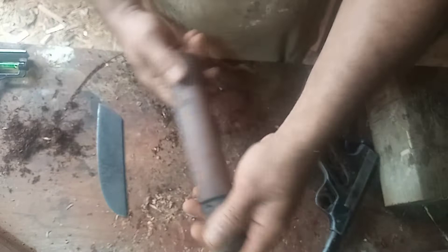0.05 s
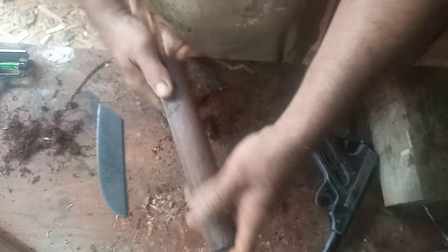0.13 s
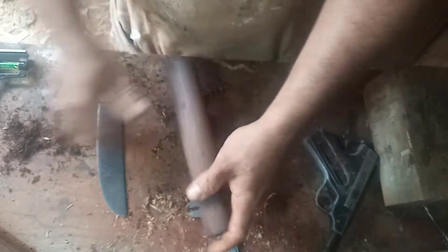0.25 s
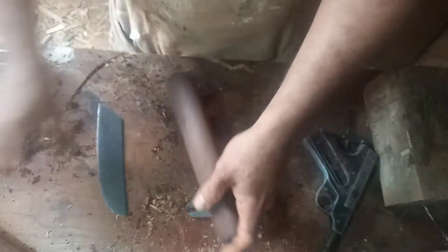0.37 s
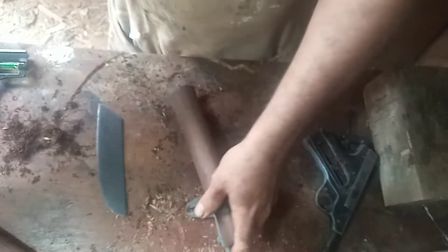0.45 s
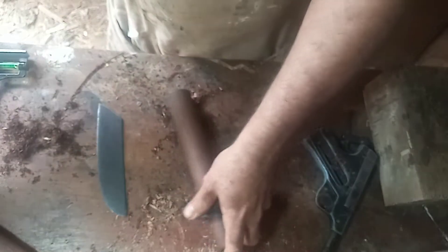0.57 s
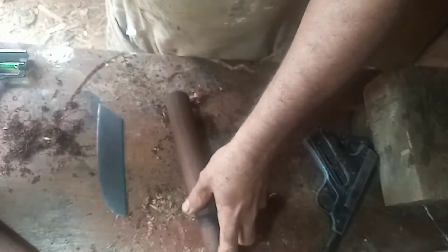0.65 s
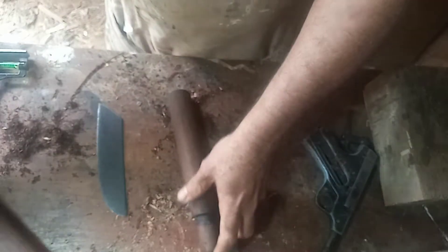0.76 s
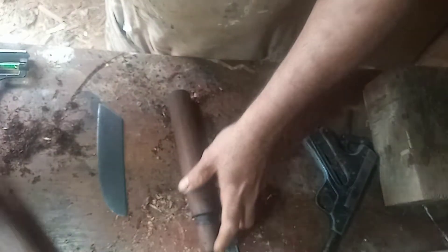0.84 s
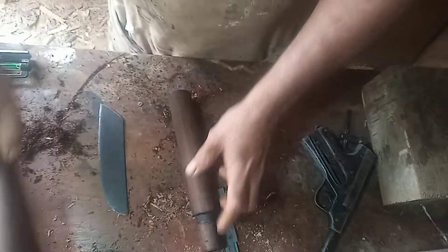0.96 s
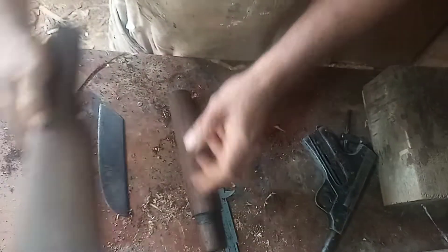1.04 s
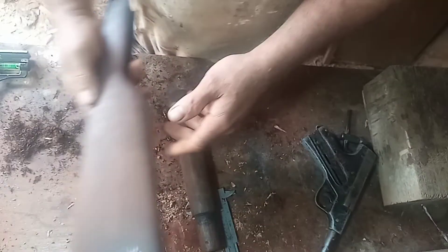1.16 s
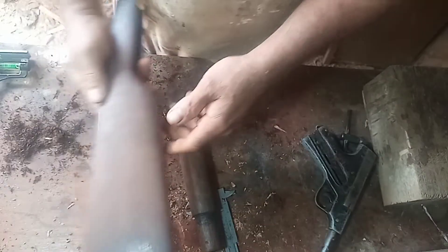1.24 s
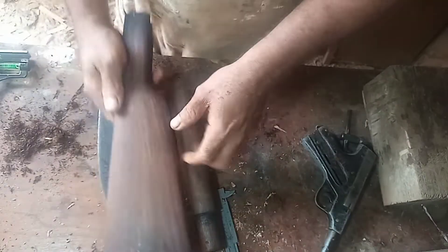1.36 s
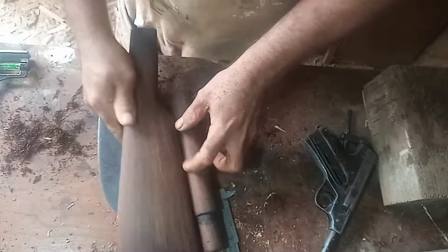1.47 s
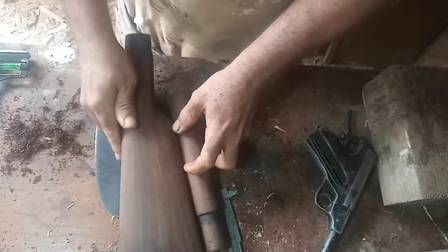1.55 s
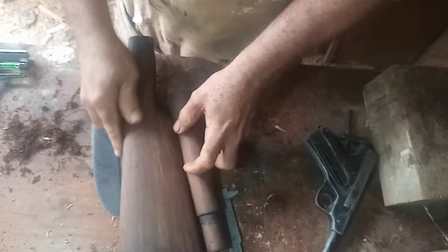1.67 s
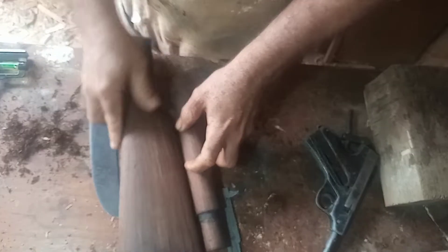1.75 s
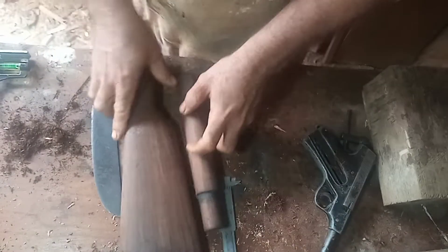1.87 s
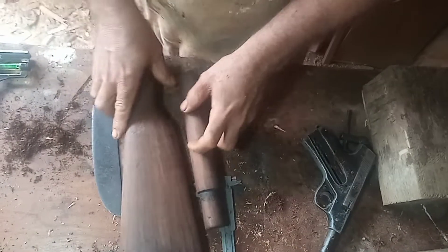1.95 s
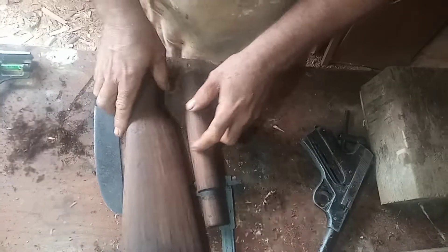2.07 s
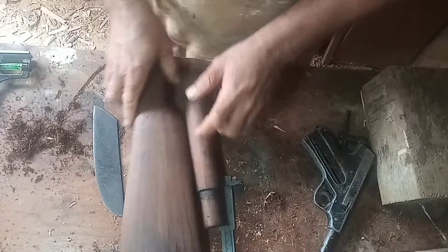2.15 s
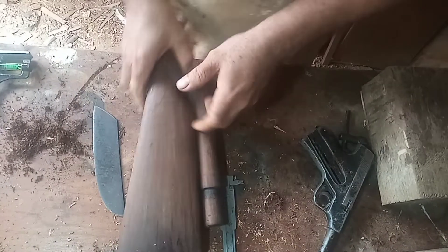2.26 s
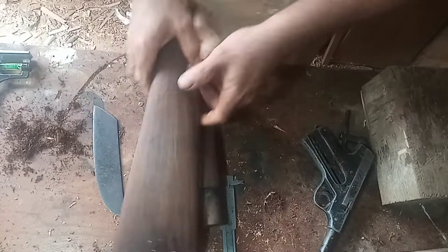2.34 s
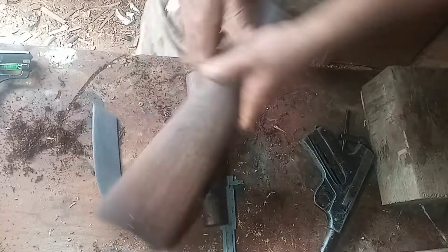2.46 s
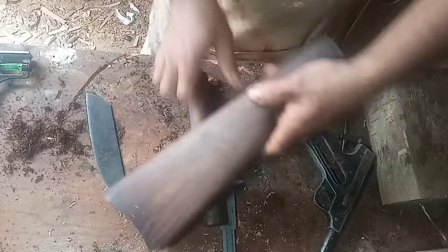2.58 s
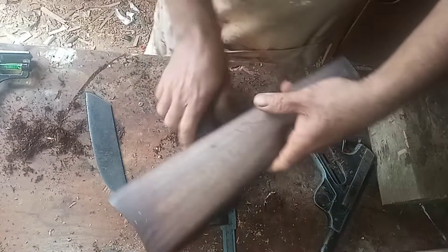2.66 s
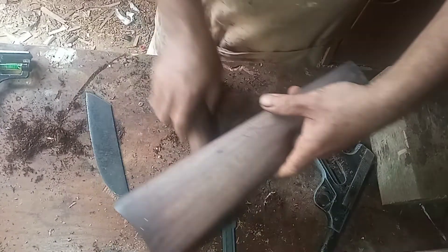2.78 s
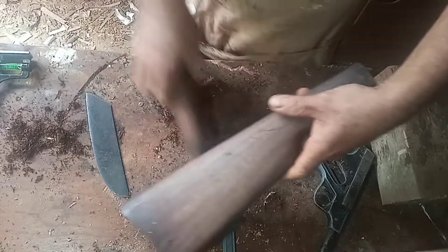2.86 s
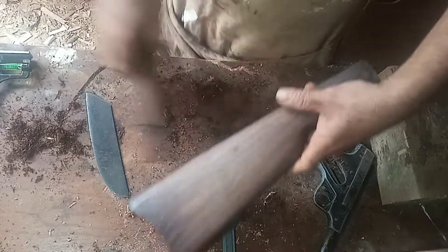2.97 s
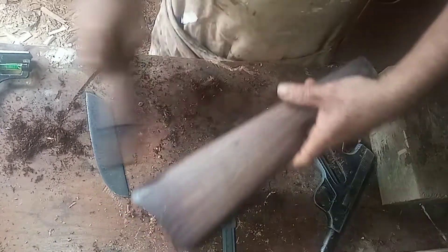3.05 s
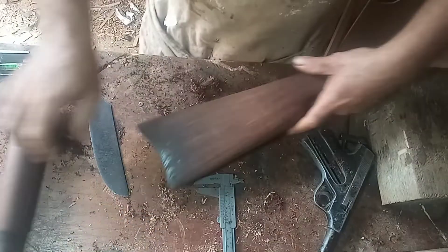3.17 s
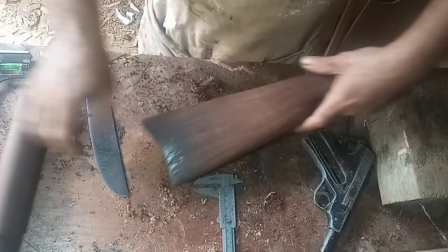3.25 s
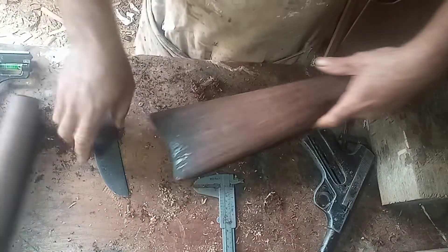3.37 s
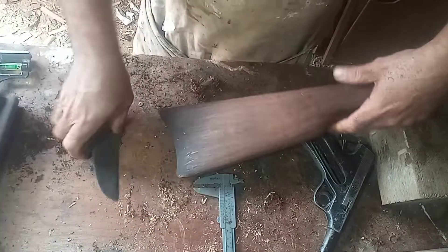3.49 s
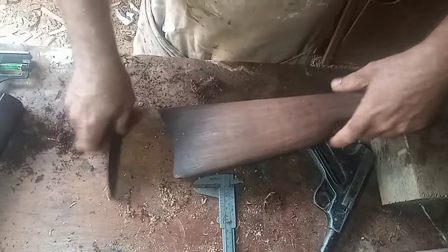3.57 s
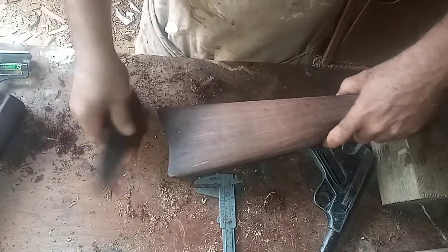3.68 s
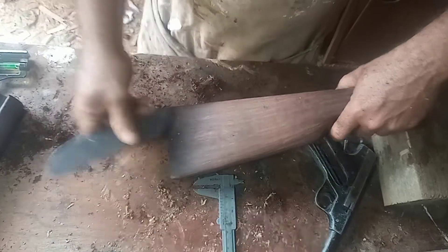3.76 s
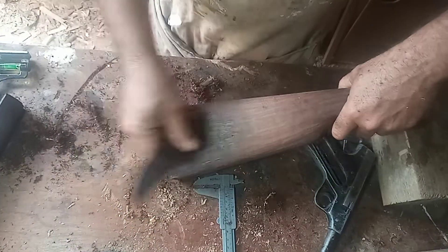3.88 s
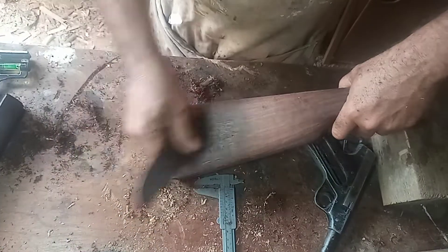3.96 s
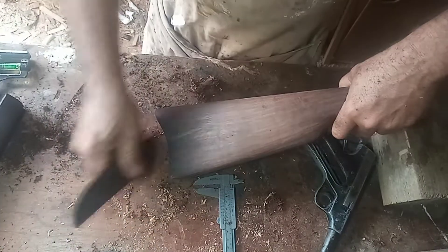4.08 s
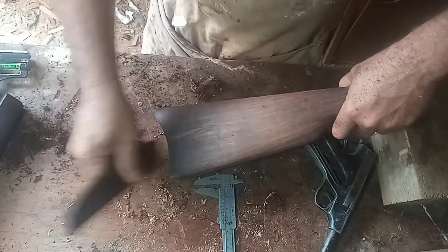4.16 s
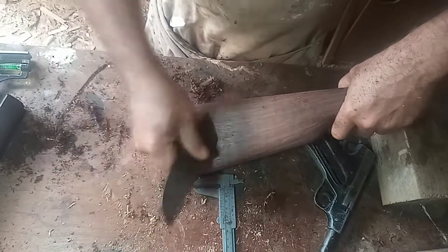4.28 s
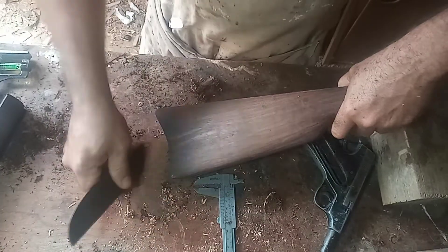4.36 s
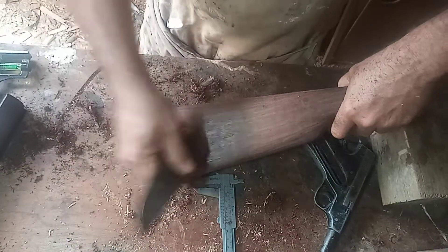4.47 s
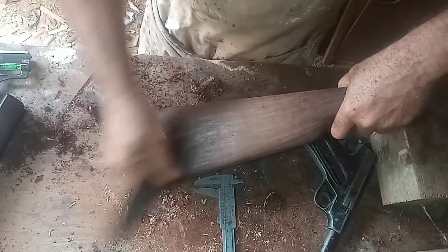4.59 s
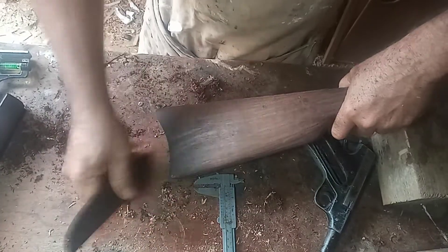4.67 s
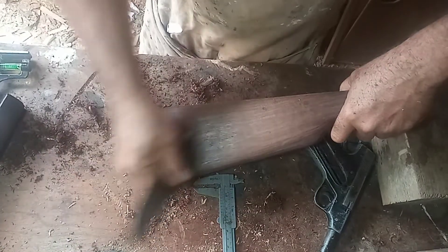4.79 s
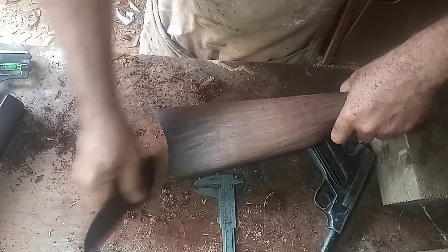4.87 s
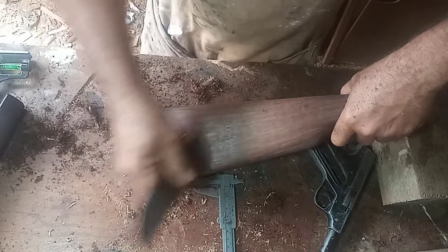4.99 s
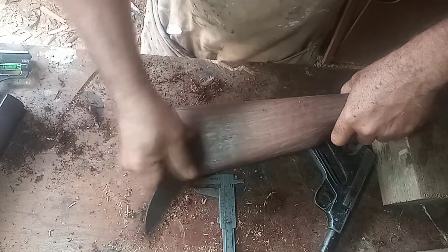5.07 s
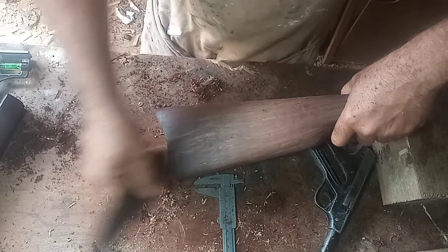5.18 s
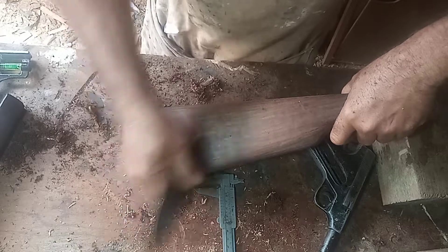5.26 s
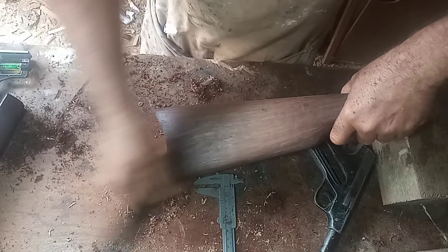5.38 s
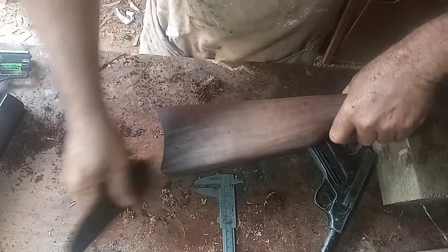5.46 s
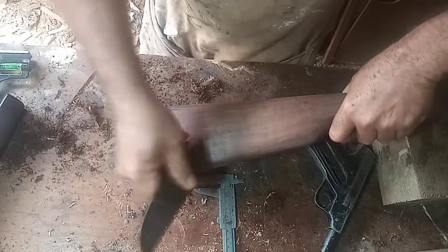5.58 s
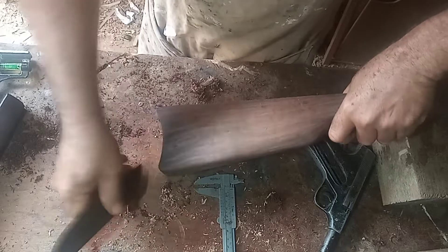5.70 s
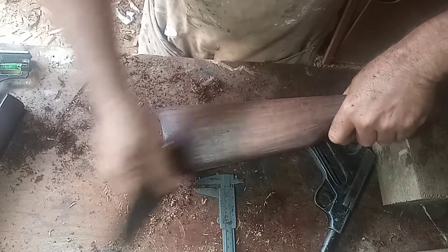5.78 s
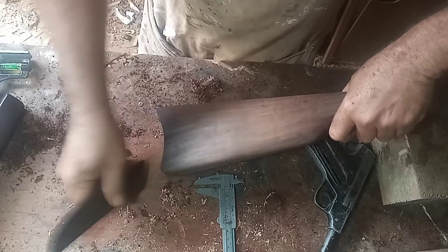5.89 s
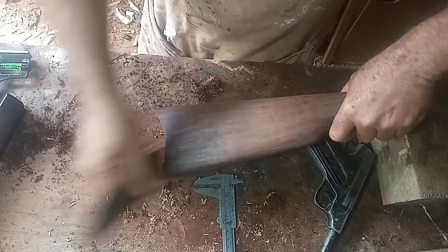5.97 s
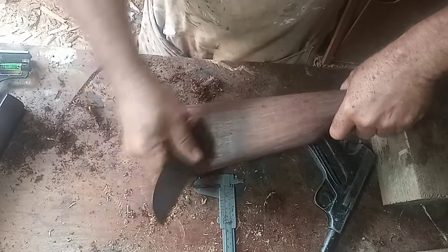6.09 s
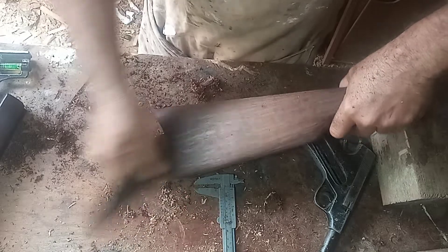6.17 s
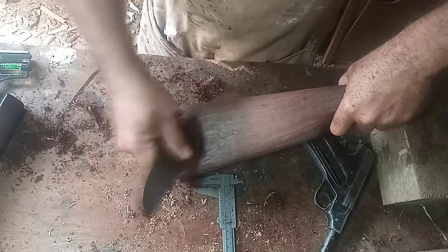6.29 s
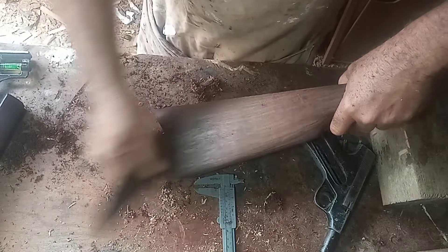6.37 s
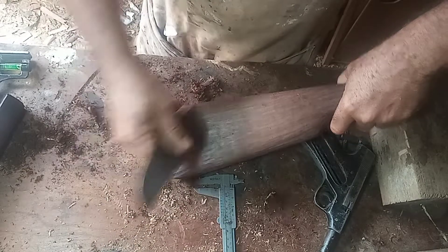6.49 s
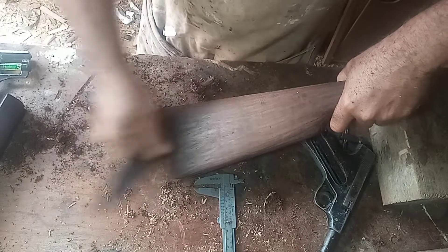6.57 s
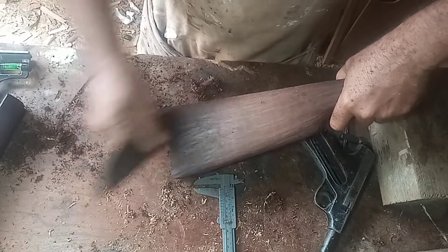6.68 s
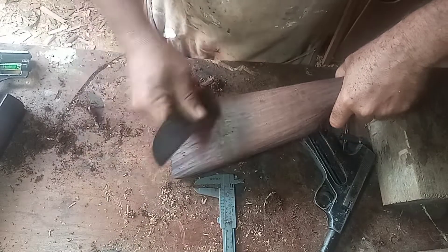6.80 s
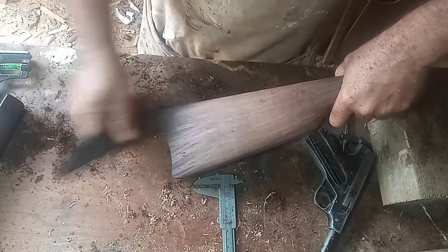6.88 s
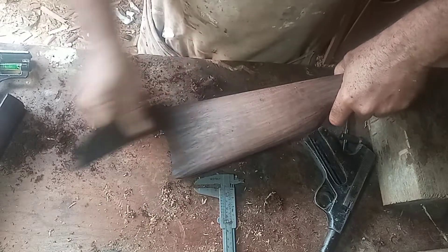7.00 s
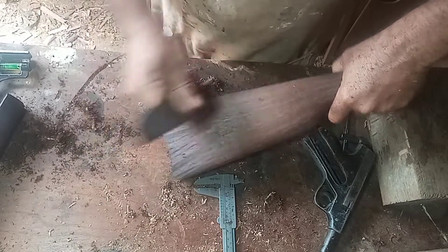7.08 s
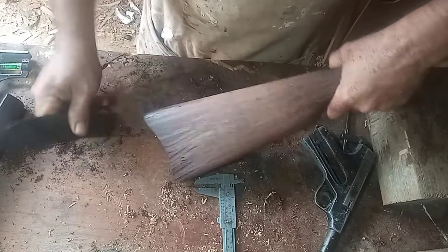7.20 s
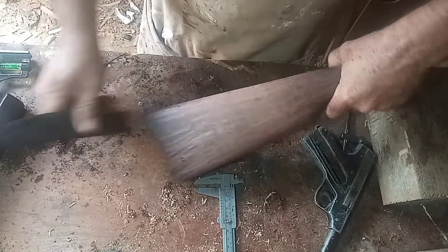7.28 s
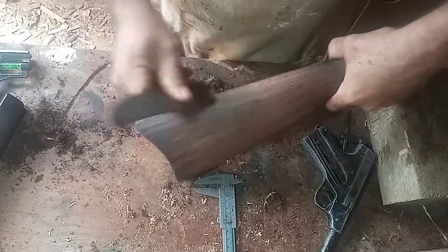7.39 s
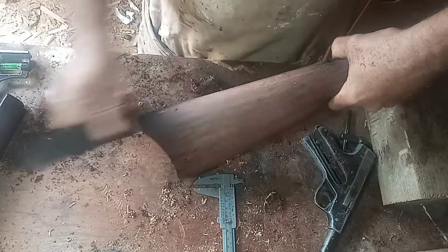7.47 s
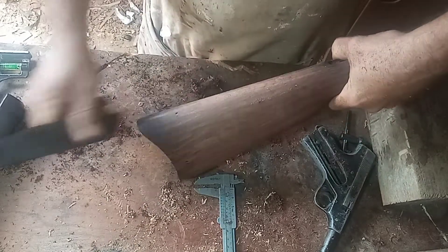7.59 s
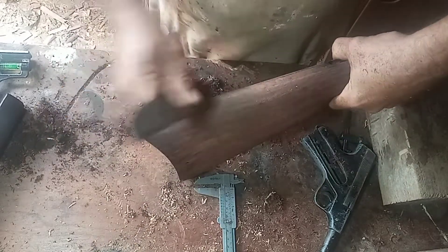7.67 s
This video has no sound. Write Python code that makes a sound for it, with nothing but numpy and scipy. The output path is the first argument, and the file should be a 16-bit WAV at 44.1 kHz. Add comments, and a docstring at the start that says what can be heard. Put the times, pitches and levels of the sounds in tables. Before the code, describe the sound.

From about 0.2 seconds, wooden parts are set down and shifted on a workbench, making irregular clacks, low thuds and short, gritty slides. Faint hollow ticks come from a rocking piece, and a steel tool clinks at 0.5 seconds. Stronger knocks land around 1.2, 1.6 and 2.2 seconds. A light metal ring follows at 2.5, then the loudest clack with a clink just before 3, and a bright click at 3.2.

At about 3.8 seconds a steel hand scraper starts shaving a wooden stock. It makes fifteen short, even strokes, nearly four a second, continuing to the end at around 7.6 seconds. Each stroke bites with a small crack, rasps brightly and ends in a knock, with the bench thudding underneath. The blade slaps the bench three times between 4 and 5.2 seconds. Everything sounds close, in a small shed with a short echo and a faint low background rush.

```python
"""Scraping wood at a workbench

In a small shed, wooden parts are set down and slid over a dusty bench. A loose hollow part rocks
and a steel tool clinks. Then a steel scraper bites the end of a wooden stock (the piece being worked)
and shaves it in quick strokes, tearing its fibres. The bench top booms under it all."""
import sys
import numpy as np
from scipy import signal
from scipy.fft import rfft, irfft, next_fast_len
from scipy.io import wavfile
from scipy.ndimage import uniform_filter1d, map_coordinates

SR = 44100
rng = np.random.default_rng(int(sys.argv[2]) if len(sys.argv) > 2 else 0)


def persist_wave(psi):
    """Save psi, clipped to +-1, as 16-bit WAV."""
    counts = np.round(np.clip(psi, -1, 1) * 32767).astype(np.int16)
    wavfile.write(sys.argv[1], SR, np.atleast_2d(counts).T)


N = 341334
HIT_SAMPLES = SR // 3

# The tones that the bench top and the stock ring with, lowest first.
# Each row: pitch in Hz, level in dB, ring time in seconds (t60, the time to fade by 60 dB).
BENCH_TONES = [(94.4, -20.5, 0.21), (163.2, -6.5, 0.11), (203.6, -2.5, 0.049), (241.6, 0.5, 0.081),
               (290.2, 2, 0.061), (310, -5.5, 0.029)]
STOCK_TONES = [(461.5, 20, 0.13), (622, -11, 0.2), (765, 2.5, 0.18), (779, 3.5, 0.12), (840, -20, 0.09),
               (990, 14, 0.058), (1204, 4, 0.071), (1300, 13, 0.026), (1430, 0, 0.16), (1767, 8.5, 0.076),
               (2050, -17, 0.11), (2281, 14.5, 0.04), (2450, 3.5, 0.0053), (3180, -2.5, 0.009),
               (3300, -9, .05)]
# The tone colours of rubbing wood, hissing grit and shaving steel. Each row: frequency in Hz, level in dB.
RUB_COLOUR = [(250, -8.5), (420, 10), (800, 8), (1300, 1), (2300, -2.5), (3500, -6), (4600, -46)]
GRIT_COLOUR = [(1800, -26.5), (3000, -3), (4700, 2), (6050, 3.5), (7800, 1.5), (8900, -15), (10700, -12.5),
               (13300, -37.5), (15000, -27), (15800, -1)]
SHAVE_COLOUR = [(250, -37.5), (450, -21.5), (1000, -5.5), (2000, 5), (3500, -4), (5300, 8.5), (6200, -2),
                (7800, -7), (9000, 4), (13000, -5), (14600, -5), (15800, -8.5)]
# Scraper strokes. Each row: start in seconds, bite in dB, bench thud in dB, length in seconds,
# shaving level at the start and at the end in dB, the wood's share in dB, closing knock in dB.
STROKES = [(3.756, -50, -52, .11, -30, -26.5, -13, -30),
           (4.0358, -29.5, -21.5, 0.082, -37.5, -24, -11, -27.5),
           (4.3228, -26, -22, 0.078, -37, -23.5, -10.5, -23),
           (4.578, -26, -28, 0.083, -36, -25.5, -17, -20),
           (4.835, -27.5, -19.5, 0.073, -34, -26.5, -10.5, -23),
           (5.0873, -26, -31.5, 0.081, -37.5, -23, -22, -32.5),
           (5.354, -26.5, -29, 0.084, -35, -24, -10, -39), (5.6094, -27, -33, 0.072, -39.5, -22.5, -9, -33),
           (5.8584, -26.5, -24, 0.063, -29.5, -25, -15.5, -23),
           (6.0885, -26, -23, 0.069, -33.5, -28.5, -9, -25.5),
           (6.334, -26, -24.5, .076, -40, -25, -4.5, -29),
           (6.6058, -26, -22.5, 0.072, -35.5, -21.5, -10.5, -27),
           (6.8956, -31, -23.5, 0.074, -20.5, -27, -12.5, -25.5),
           (7.218, -31.5, -22, 0.075, -23.5, -28, -13, -30.5),
           (7.519, -33.5, -20.5, 0.078, -26, -24.5, -16, -25)]


def amp(db):
    """Turn decibels into a gain."""
    return 10 ** (np.asarray(db) / 20)


def unit(x):
    """Scale a sound to an average (rms) level of 1."""
    return x / np.sqrt(np.mean(x ** 2) + 1e-20)


def unit_attack(x):
    """Scale a hit so that its first 12.5 ms have an average level of 1."""
    return x / np.sqrt(np.mean(x[:SR // 80] ** 2))


def add(track, start, x):
    """Mix a sound in at a start time in seconds."""
    track[round(start * SR):][:len(x)] += x


def along(points, hz):
    """Read between (Hz, value) points on a log frequency scale."""
    freqs, values = np.transpose(points)
    return np.interp(np.log(hz + 1), np.log(freqs + 1), values)


def wobble(rate, size=N):
    """A smooth curve through `rate` random points a second."""
    points = rng.standard_normal(int(size * rate / SR) + 4)
    return map_coordinates(points, [np.arange(size) * rate / SR])


def filtered(x, response):
    """Change each frequency's level and phase by response(hz)."""
    size = next_fast_len(x.shape[-1] + 8192)
    spectrum = rfft(x, size) * response(np.fft.rfftfreq(size, 1 / SR))
    return irfft(spectrum, size)[..., :x.shape[-1]]


def tinted(x, colour):
    """Give a sound a tone colour."""
    return filtered(x, lambda hz: amp(along(colour, hz)))


def resonances(peaks):
    """A response with a peak at each (centre in Hz, width in Hz, dB), alternating in sign."""
    return lambda hz: sum((-1) ** k * amp(db) * 1j * hz * width / (centre**2 - hz**2 + 1j * hz * width)
                          for k, (centre, width, db) in enumerate(peaks))


def shaken(force, tones):
    """An object rings under a steady shaking; longer tones make narrower peaks."""
    peaks = [(hz, np.log(1000) / (np.pi * t60), db) for hz, db, t60 in tones]
    return unit(filtered(force, resonances(peaks)))


def grit(rate, spread_db, clump_db, size=N):
    """Tiny random contacts, about `rate` a second, that grow stronger and weaker in clumps."""
    contacts = rng.random(size) < rate / SR
    strength = amp(spread_db * rng.exponential(size=size)) * rng.standard_normal(size)
    return contacts * strength * amp(clump_db * wobble(170, size))


def patchy(x, depth_db):
    """Patches of the sound get louder and softer as contact spots come and go."""
    spectra = signal.stft(x, nperseg=256)[2]
    patches = uniform_filter1d(rng.standard_normal(spectra.shape), size=3, axis=0)  # across frequency
    patches = uniform_filter1d(patches, size=14, axis=1)  # across time
    return signal.istft(spectra * amp(depth_db * unit(patches)), nperseg=256)[1][:len(x)]


def ring(tones, stretch, attack_s, scatter_db):
    """One blow: each tone gets a new strength and the grip detunes it. Stretch scales the ring time."""
    t = np.arange(HIT_SAMPLES) / SR
    out = np.zeros(HIT_SAMPLES)
    for hz, db, t60 in tones:
        fade = amp(db + scatter_db * rng.normal() - 60 * t / (t60 * stretch))
        pitch = hz * (1 + .02 * rng.normal())
        out += fade * np.sin(2 * np.pi * pitch * t)
    return unit_attack(out * (1 - np.exp(-t / attack_s)))


def crack(colour, t60):
    """A short burst of noise."""
    t = np.arange(HIT_SAMPLES) / SR
    noise = tinted(rng.standard_normal(HIT_SAMPLES), colour)
    return unit_attack(noise * amp(-60 * t / t60) * (1 - np.exp(-t / 0.00052)))


def swell(start, rise, hold, top_db, rise_db, fade_db_per_s):
    """A gain that climbs by rise_db to its top, holds and fades."""
    t = np.arange(N) / SR - start
    onset = np.clip(t / .004, 0, 1)
    climb = amp(-rise_db * np.clip(1 - t / max(rise, .001), 0, 1))
    return onset * climb * amp(top_db - fade_db_per_s * np.clip(t - rise - hold, 0, None))


def shed_air():
    """The quiet shed: a faint, low rush."""
    # Each row: frequency in Hz, level in dB.
    air_colour = [(15, -18.5), (50, 12), (100, 4), (300, -6.5), (500, -13), (900, -15), (1500, -23),
                  (4000, -25), (7500, -30), (9000, -37), (15800, -50)]
    return amp(-53.5) * unit(tinted(rng.standard_normal((2, N)), air_colour))


def knocks():
    """Each blow makes the stock clack and the bench thud, with a snap in the treble."""
    # Each row: start in seconds, clack peak in dB, thud in dB, snap in dB, ring stretch (1 is usual).
    blows = [(0.203, -30.5, -18, -63, 0.7), (0.363, -15.5, -21.5, -55, 1.2),
             (0.376, -18.5, -33.5, -47.5, 0.61), (0.429, -20.5, -20.5, -30, 1.5),
             (0.477, -43, -70, -35.5, 0.63), (0.518, -27, -28, -34, 3.6), (0.551, -27, -19.5, -40, 1.14),
             (0.605, -15, -28.5, -39, 1.2), (0.683, -29.5, -32.5, -57, 0.97), (1.125, -80, -27, -64, 1.16),
             (1.223, -14, -9.5, -40, 0.79), (1.289, -28, -22, -49, 1.9), (1.433, -23.5, -20, -59, 1.74),
             (1.556, -12.5, -14.5, -36, 1.6), (1.72, -60, -28, -73, 1.2), (1.794, -67, -69, -46, 0.8),
             (1.818, -66, -38.5, -55, 1.3), (1.944, -32, -26.5, -73.5, 1.6), (1.975, -17.5, -24, -53, 0.8),
             (2.004, -28.5, -22.5, -55.5, 0.87), (2.078, -58, -23.5, -63, 1.7),
             (2.138, -32, -24, -71.5, 0.47), (2.208, -16.5, -9.5, -43, 0.74), (2.246, -20, -14, -54, 1.03),
             (2.548, -47, -24, -42, 2.3), (2.566, -23.5, -26.5, -45, 0.44), (2.621, -37, -28, -31.5, 1.3),
             (2.734, -19.5, -9, -46, 0.86), (2.81, -27, -20, -62, 0.83), (2.932, -10.5, -25.5, -36, 0.58),
             (2.945, -4, -25, -27.5, 1.6), (3.155, -33.5, -30, -45, 0.41), (3.208, -18, -35.5, -26.5, 0.24),
             (3.306, -25, -25.5, -46, 2.6), (3.345, -26, -25, -53, 0.53), (3.419, -64, -26.5, -67, 0.8),
             (3.581, -70, -16, -78, 0.85), (3.647, -21, -23.5, -43, 0.73), (6.221, -39, -57, -48, 1.2),
             (7.129, -66, -28.5, -73, 2.2), (7.149, -55, -30.5, -68, 1.2), (7.173, -46, -21.5, -78, 1.1)]
    out = np.zeros(N + SR)
    for start, clack_db, thud_db, snap_db, stretch in blows:
        clack = ring(STOCK_TONES, .7 * min(stretch, 1.5), attack_s=0.00062, scatter_db=3)
        clack += 1.19 * crack(RUB_COLOUR, 0.036 * stretch)
        clack /= np.abs(clack).max()
        thud = ring(BENCH_TONES, stretch, attack_s=0.0019, scatter_db=7.5)
        snap = crack(GRIT_COLOUR, 0.0086 * stretch)
        add(out, start, amp(clack_db) * clack + amp(thud_db) * thud + amp(snap_db) * snap)
    return out[:N]


def slides_and_boom():
    """Dust rubs under sliding wood; the shifting weight and every scraper stroke shake the bench."""
    # Each row: start, rise and hold in seconds, then rub, hiss, boom and deepest bench tone in dB.
    slides = [(0.204, .01, 0.052, -48.5, -79, -45, -39.5), (.37, 0.063, 0.17, -33.5, -44.5, -37, -37),
              (0.656, 0.027, 0.034, -53, -52.5, -39, -57), (1.115, 0.017, .06, -63.5, -63.5, -49.5, -51),
              (1.229, 0.0064, 0.054, -37, -41.5, -28, -25), (1.421, 0.11, 0.0082, -40.5, -44, -34, -38),
              (1.555, 0.0042, 0.077, -36.5, -39, -26.5, -24.5), (1.798, .005, .08, -65, -52.5, -61, -59),
              (1.858, 0.099, .05, -45, -42, -37, -46), (2.022, 0.028, 0.078, -49, -57.5, -30, -34),
              (2.121, 0.049, 0.046, -50, -44.5, -57, -42), (2.204, 0.0075, 0.1, -45, -53, -34.5, -30.5),
              (2.345, 0.015, 0.031, -53, -55, -48, -42), (2.487, 0.058, 0.076, -45.5, -41.5, -34, -44.5),
              (2.734, 0.0086, .16, -43, -50.5, -36, -40.5), (2.952, .005, 0.08, -30, -44, -28.5, -35),
              (3.074, 0.022, .11, -46.5, -51.5, -33, -31.5), (3.213, 0.0035, .13, -39.5, -45.5, -44.5, -43),
              (3.396, 0.017, 0.1, -68, -59, -44.5, -42), (3.655, 0.0081, 0.041, -46.5, -40, -34, -44),
              (4.99, .02, .05, -72, -80, -49, -64), (5.24, 0.022, 0.07, -76, -88, -47.5, -72),
              (7.099, 0.035, 0.11, -68, -80, -29.5, -53)]
    # How fast the rub, hiss, boom and deepest tone fade, in dB a second.
    fades = [307, 345, 315, 183]
    rub, hiss, boom, deep = [
        sum(swell(start, rise, hold, levels[k], 24.5, fade) for start, rise, hold, *levels in slides)
        for k, fade in enumerate(fades)]
    for start, _, _, length, *_, exit_db in STROKES:
        boom += swell(start, length, 0, exit_db - 4.5, 15, fades[2])
        deep += swell(start, length + 0.026, 0, exit_db - 10, 15, fades[3])  # peaks a little later
    dust = patchy(grit(9000, spread_db=1.5, clump_db=2.5), depth_db=3.5)
    wood = unit(tinted(dust, RUB_COLOUR)) + 0.48 * shaken(dust, STOCK_TONES)
    shake = rng.standard_normal(N) * amp(3 * wobble(35))
    bench = boom * shaken(shake, BENCH_TONES[1:]) + deep * shaken(shake, BENCH_TONES[:1])
    return rub * unit(wood) + hiss * unit(tinted(dust, GRIT_COLOUR)) + bench


def hollow_ticks():
    """A loose hollow part ticks as it rocks."""
    # Each row: start in seconds, peak level in dB.
    ticks = [(0.307, -40), (0.754, -37.5), (0.785, -40), (0.86, -35), (0.889, -44), (0.933, -41.5),
             (1.031, -41), (1.192, -45), (1.352, -32), (1.744, -46), (1.867, -44), (2.379, -44),
             (3.96, -35), (6.265, -36.5), (7.389, -32)]
    # Each row: pitch in Hz, level in dB, ring time in seconds before the stretch shortens it.
    hollow_tones = [(748, -2, 0.06), (752, 7, 0.048), (885, -14, 0.046), (1170, -6, 0.1)]
    out = np.zeros(N + SR)
    for start, db in ticks:
        tick = ring(hollow_tones, stretch=0.32, attack_s=0.004, scatter_db=2)
        add(out, start, amp(db) * tick / np.abs(tick).max())
    return out[:N]


def tool_clinks():
    """The nudged steel tool rings with three close tones."""
    # Each row: start in seconds, level in dB, pitch in Hz, ring time in seconds.
    clinks = [(.482, -28, 3840, 0.024), (.492, -26.5, 3880, 0.024), (2.485, -47.5, 2256, 0.53),
              (2.52, -41.5, 2780, 0.082), (2.567, -34, 2265, 0.03), (2.948, -29, 2295, 0.25),
              (6.225, -46, 2680, 0.021)]
    out = np.zeros(N + SR)
    for start, db, hz, t60 in clinks:
        tones = [(hz, 0, t60), (hz * 1.04, -4, t60 * .6), (hz * .97, -5, t60 * .6)]
        add(out, start, amp(db) * ring(tones, stretch=1, attack_s=.001, scatter_db=2))
    return out[:N]


def steel_clicks():
    """Steel meets steel with a very bright click."""
    # Each row: start in seconds, level in dB, fade time in seconds.
    clicks = [(1.223, -37, 0.068), (1.556, -51, 0.064), (2.944, -41.5, .03), (3.208, -30.5, 0.048)]
    out = np.zeros(N + SR)
    for start, db, t60 in clicks:
        add(out, start, amp(db) * crack(SHAVE_COLOUR, t60))
    return out[:N]


def scraper():
    """The edge bites, tears fibres that shake the blade and the wood, and drops off the end."""
    # Where the blade rings. Each row: pitch in Hz, width of the peak in Hz, level in dB.
    blade_peaks = [(3415, 335, -4.5), (5134, 370, -3.5), (5920, 360, -4), (6070, 354, 7.5),
                   (7500, 440, 3.5), (8190, 1340, -2), (10000, 440, -22.5), (16500, 920, 3)]
    out = np.zeros(N + SR)
    t = np.arange(SR // 4) / SR
    onset = 1 - np.exp(-t / 0.014)
    for start, bite_db, thud_db, length, from_db, to_db, wood_db, exit_db in STROKES:
        # The blade's level follows its speed; the wood's follows the load on the edge.
        speed_db = np.interp(t, [0, .7 * length, length, length + .005],
                             [from_db - 4, to_db, to_db - 5, -90])
        load_db = np.interp(t, [0, length, length + 0.0034], [from_db, to_db, -90])
        fibres = patchy(grit(14000, spread_db=1.4, clump_db=2, size=len(t)), depth_db=1.5)
        peaks = [(hz * (1 + .006 * rng.normal()), width, db + 1.6 * rng.normal())
                 for hz, width, db in blade_peaks]
        blade = unit(filtered(fibres, resonances(peaks)))
        wood = shaken(fibres, STOCK_TONES) + 0.4 * shaken(fibres, BENCH_TONES)
        tearing = 0.5 * unit(tinted(fibres, SHAVE_COLOUR)) + amp(wood_db) * wood
        add(out, start, onset * (amp(speed_db) * blade + amp(load_db) * tearing))
        add(out, start, edge_bite(bite_db, thud_db))
        add(out, start + length - .008, amp(exit_db) * exit_knock())
    return out[:N]


def edge_bite(bite_db, thud_db):
    """The edge digs in with a crack that rings the stock and the bench."""
    # Each row: frequency in Hz, level in dB.
    bite_colour = [(200, -5.5), (600, -5), (2000, 1), (3500, 3.5), (5000, -8.5), (6200, 3.5), (8000, -15.5),
                   (10000, -13.5), (13000, -26.5), (16500, -26.5)]
    snap = crack(bite_colour, t60=0.0035)
    stock = ring(STOCK_TONES, stretch=0.46, attack_s=0.00045, scatter_db=3.5)
    bench = ring(BENCH_TONES, stretch=1, attack_s=0.00083, scatter_db=4)
    return amp(bite_db) * (snap + 0.47 * stock) + amp(thud_db) * bench


def exit_knock():
    """Bench and stock knock as the edge leaves the wood."""
    bench = ring(BENCH_TONES, stretch=0.63, attack_s=0.0047, scatter_db=6)
    stock = ring(STOCK_TONES, stretch=0.39, attack_s=.002, scatter_db=4)
    return bench + 0.58 * stock


def blade_slaps():
    """The blade drops past the end and lands flat on the bench."""
    # Each row: start in seconds, level in dB, fade time in seconds.
    slaps = [(4.134, -27.5, 0.38), (4.418, -30, 0.3), (5.183, -28.5, 0.19)]
    # Each row: frequency in Hz, level in dB.
    slap_colour = [(300, 8), (900, -5), (1800, -2.5), (3500, -4), (5000, -9), (7500, -13), (9000, -28.5),
                   (16000, -39)]
    out = np.zeros(N + SR)
    for start, db, t60 in slaps:
        add(out, start, amp(db) * (crack(slap_colour, t60) + 2.18 * crack(slap_colour, 0.0046)))
    return out[:N]


def shed_echo(x):
    """Near things answer first, then the walls, differently left and right and anew as things move."""
    # Each row: frequency in Hz, echo fade time in seconds.
    wall_t60 = [(100, 0.31), (300, 0.18), (1000, 0.28), (4000, 0.23), (8000, 0.15), (13000, 0.13)]
    hop, delay = SR // 12, 30  # in samples
    noise = rng.standard_normal((N // hop + 1, 2, HIT_SAMPLES))
    hz, t, spectra = signal.stft(noise, SR, nperseg=256)
    walls = amp(-60 * t / along(wall_t60, hz)[:, None])
    near_things = 4 * amp(-60 * t / 0.026)
    tails = signal.istft(spectra * (walls + near_things), SR, nperseg=256)[1]
    x = np.pad(x, (hop, 2 * hop))
    window = np.sin(np.pi * np.arange(2 * hop) / (2 * hop))
    out = np.zeros((2, N + SR))
    for k, tail in enumerate(tails):  # each overlapping piece of sound gets its own echo
        piece = x[k * hop:][:2 * hop] * window
        echo = signal.fftconvolve(piece[None], tail / np.linalg.norm(tail[0]), axes=1)
        out[:, k * hop + delay:][:, :echo.shape[1]] += echo
    return tinted(out[:, hop:hop + N], [(150, -14), (400, -6), (1000, 1.5), (5000, 3), (12000, 3)])


def scene():
    """Mix it all in stereo. The bench is nearer the right microphone, so the left hears it later."""
    # Each row: frequency in Hz, left level minus right level in dB.
    balance = [(60, 2), (300, 5), (700, 2.5), (1300, 4.5), (2400, 7.5), (5000, 3), (7500, 12.5),
               (8600, -3.5), (15000, -0.1)]
    left_lag_s = 46 / SR
    side = np.array([[.5], [-.5]])  # left, right
    direct = (scraper() + blade_slaps() + knocks() + steel_clicks() + tool_clinks()
              + hollow_ticks() + slides_and_boom())
    mix = direct + shed_echo(direct) + shed_air()
    return filtered(mix, lambda hz: amp(side * along(balance, hz))
                    * np.exp(-2j * np.pi * hz * side * left_lag_s))


def record(dry):
    """The deep bass is thinned, the biggest peaks are rounded and the highest treble is cut."""
    bass_hz, ceiling, top_hz = 75, .97, 17000
    thinned = filtered(dry, lambda hz: (1j * hz / (bass_hz + 1j * hz)) ** 2)
    rounded = thinned / (1 + np.abs(thinned / ceiling) ** 8) ** (1 / 8)
    treble = lambda hz: amp(np.interp(hz, [15670, 15920, top_hz], [0, -30, -45])) * (hz < top_hz)
    return filtered(rounded, treble)


dry = scene()
out = record(dry)
persist_wave(out)
```